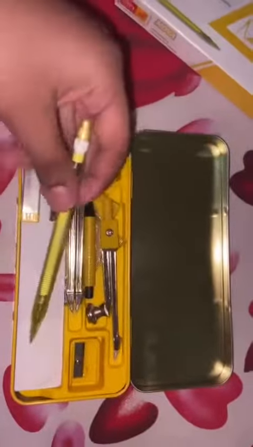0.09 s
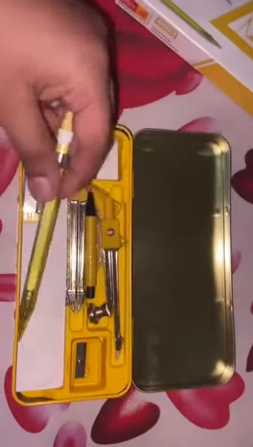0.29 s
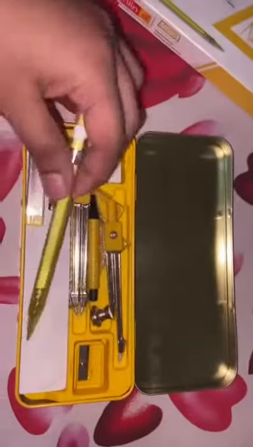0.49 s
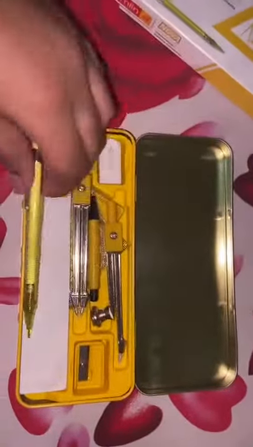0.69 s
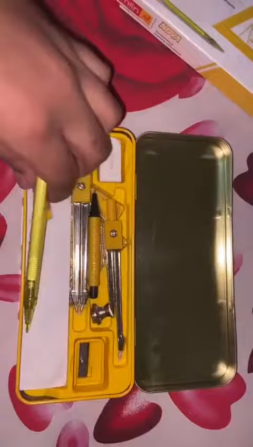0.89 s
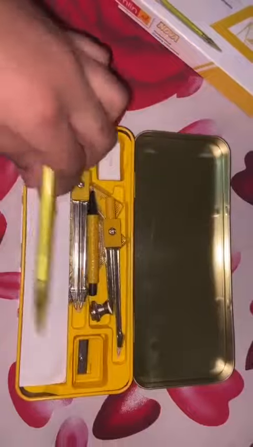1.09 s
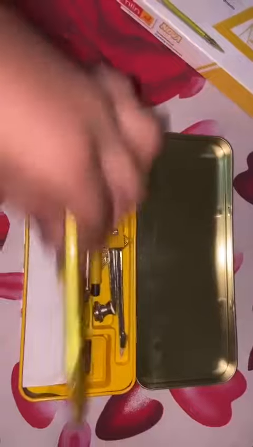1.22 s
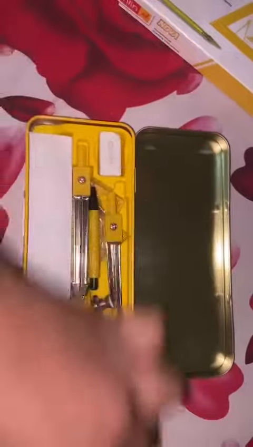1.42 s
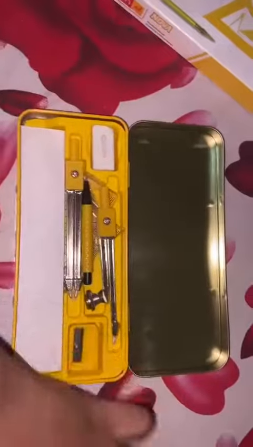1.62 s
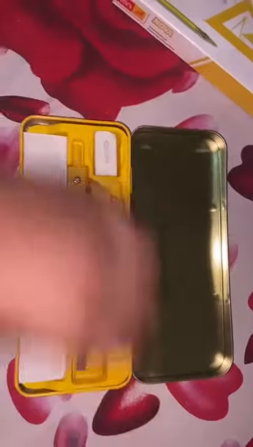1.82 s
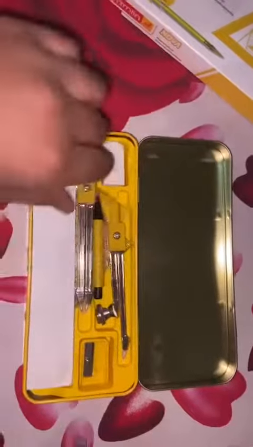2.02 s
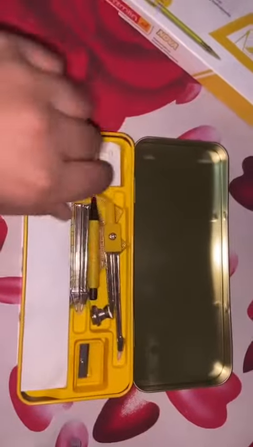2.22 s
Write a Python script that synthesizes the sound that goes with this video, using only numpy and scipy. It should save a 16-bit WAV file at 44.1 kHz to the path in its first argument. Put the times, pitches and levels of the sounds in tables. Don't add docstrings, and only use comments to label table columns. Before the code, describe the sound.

Plastic instrument tray knocks sharply in a thin tin case as a pencil rattles free

```python
import sys
import numpy as np
from scipy import signal
from scipy.fft import rfft, irfft
from scipy.io import wavfile

SR = 44100
rng = np.random.default_rng(int(sys.argv[2]) if len(sys.argv) > 2 else 0)


def decibels_to_gain(level_db):
    exponent = np.asarray(level_db, float) / 20
    return 10 ** exponent


def materialize(psi):
    bounded = np.clip(np.atleast_2d(psi).T, -1, 1)
    quanta = np.round(bounded * 32767).astype(np.int16)
    wavfile.write(sys.argv[1], SR, quanta)


N = 101430

# [f/Hz, level/dB]
TRAY_MODES = [(400, -14.5), (900, -13.5), (1250, -14), (1570, -4), (2300, 1.5), (2900, -3.5), (3670, -2),
              (4400, -6), (5100, -9.5), (5900, -7), (7000, -7), (8300, -8.5), (9600, -10), (11000, -14.5)]
# [f/Hz, density/dB per Hz]
RUB_COLOUR = [(250, 2), (400, -0.5), (700, -13), (1500, -6), (2500, -2), (4000, -11), (8000, -16),
              (12000, -23)]
TRAY_T60_S = 0.019
TRAY_LOW_HZ = 237


def rms_one(x):
    return x / np.sqrt(np.mean(x ** 2) + 1e-20)


def coloured(x, points):
    hz, db = np.transpose(points)
    bin_hz = np.maximum(np.arange(len(x) // 2 + 1) * SR / len(x), 1)
    gain = decibels_to_gain(np.interp(np.log(bin_hz), np.log(hz), db))
    return rms_one(irfft(rfft(x) * gain, len(x)))


def filtered(x, order, edge_hz, kind):
    return signal.sosfilt(signal.butter(order, edge_hz, kind, fs=SR, output="sos"), x)


def add(out, s, x):
    i = int(s * SR)
    out[i:i + len(x)] += x[:len(out) - i]


def air():
    # [f/Hz, density/dB]
    hiss_colour = [(25, -11), (50, -1.5), (140, -5), (200, -13.5), (370, -13), (520, -19.5), (4000, -27),
                   (11500, -30.5)]
    # [f/Hz, width/Hz, level/dB]
    fan_lines = [
        (49, 12.5, -67.5),
        (92.2, 6.2, -71.5),
        (137.63, 3.07, -63.5),
        (363.2, 24, -71.5),
        (7870, 710, -73),
    ]
    out = decibels_to_gain(-57.5) * coloured(rng.standard_normal(N), hiss_colour)
    for hz, width_hz, db in fan_lines:
        noise = rng.standard_normal(N + SR)
        line = filtered(noise, 2, [hz - width_hz / 2, hz + width_hz / 2], "band")
        out = out + decibels_to_gain(db) * rms_one(line[SR:])
    return out


def rubbing():
    # [t/s, level/dB]
    handling = [(0, -56), (0.051, -50.5), (.1, -68), (.155, -63.5), (0.227, -41.5), (.4, -65.5),
                (0.502, -70.5), (.55, -43.5), (0.669, -51), (.74, -56.5), (0.852, -47), (.93, -52.5),
                (1.072, -73), (1.75, -67.5), (1.96, -64), (2.032, -56), (2.17, -59), (2.22, -65)]
    grains_per_s, grain_db = 1200, 1.5
    s, db = np.transpose(handling)
    sizes = decibels_to_gain(grain_db * np.minimum(rng.exponential(1, N), 4)) * rng.choice([-1, 1], N)
    grains = sizes * (rng.random(N) < grains_per_s / SR)
    body = coloured(grains, RUB_COLOUR) + decibels_to_gain(0.5) * coloured(rng.standard_normal(N), RUB_COLOUR)
    r = decibels_to_gain(-60 / (TRAY_T60_S * SR))
    for hz, level_db in TRAY_MODES[3:6]:
        w = 2 * np.pi * hz / SR
        ring = signal.lfilter([1], [1, -2 * r * np.cos(w), r * r], grains)
        body = body + decibels_to_gain(level_db - 12) * rms_one(ring)
    body = filtered(body, 4, TRAY_LOW_HZ, "high")
    return decibels_to_gain(np.interp(np.arange(N) / SR, s, db)) * rms_one(body)


def scraping():
    # [t/s, length/s, level/dB, brightness/dB]
    scrapes = [
        (0.016, 0.069, -48.5, -20),
        (0.174, 0.13, -53, -3.5),
        (0.805, 0.0348, -38.5, -9),
        (0.84, 0.066, -45, -17),
        (1.835, 0.132, -74, 14.5),
        (1.984, 0.059, -39.5, -35),
        (2.143, 0.04, -47.5, -12),
    ]
    edge_s = 0.0046
    out, t = np.zeros(N), np.arange(N) / SR
    grains = rng.standard_normal(N) ** 3
    dull = filtered(coloured(grains, RUB_COLOUR), 2, 700, "high")
    bright = rms_one(np.diff(grains, prepend=0))
    for s, length_s, db, bright_db in scrapes:
        envelope = np.clip(np.minimum(t - s, s + length_s - t) / edge_s, 0, 1)
        out += decibels_to_gain(db) * envelope * (dull + decibels_to_gain(bright_db) * bright)
    return out


def ticks():
    # [t/s, peak/dB, f/Hz, broad click/dB]
    steel_ticks = [(0.022, -32, 8700, -6), (0.031, -39, 8900, -5), (0.063, -42, 6500, -13),
                   (0.067, -33.5, 3000, 8), (.076, -36, 2580, -1), (.985, -48, 2950, -10.5),
                   (1.2009, -32.5, 8960, -6.5), (1.25, -49, 7550, -26.5), (1.262, -49.5, 7670, -28.5),
                   (1.477, -45.5, 8770, -7), (1.580, -34.5, 9070, -25), (1.684, -45, 8700, -2),
                   (1.687, -41, 8530, -8), (1.709, -40.5, 10700, -20.5), (1.716, -43, 2130, -32),
                   (1.722, -45, 10600, -20), (1.747, -46.5, 10900, -26)]
    out, t = np.zeros(N), np.arange(900) / SR
    for s, peak_db, hz, wide_db in steel_ticks:
        noise = rng.standard_normal((2, len(t)))
        x = rms_one(filtered(noise[0], 1, [hz / 1.25, hz * 1.2], "band"))
        x = x + decibels_to_gain(wide_db) * np.diff(noise[1], prepend=0)
        x = x + decibels_to_gain(2.5) * np.sin(2 * np.pi * hz * t)
        x = x * decibels_to_gain(-60 * t / (0.007 + 10 / hz))
        add(out, s, decibels_to_gain(peak_db) * x / np.abs(x).max())
    return out


def struck(hits, modes, t60_s):
    # [t/s, f/Hz, gain/dB]
    spots = [(.202, 2740, 17), (.216, 2817, 2), (.292, 4200, 3), (.292, 6740, 9), (.52, 3720, -4.5),
             (.424, 3000, -6.5), (.216, 7870, 4), (.216, 9900, 2), (.52, 2200, 6), (.52, 7760, 9.5),
             (.52, 10300, 7), (.528, 2970, 1.5), (.533, 2900, 6), (.542, 2900, 2), (.627, 3000, 6),
             (.632, 3910, 5.5), (.632, 5460, 16), (.64, 3040, 5.5), (.64, 3940, 8), (.64, 850, 9.5),
             (.807, 2950, 7.5), (.8105, 2870, 4), (.815, 2970, 6), (2.068, 1480, 4), (.216, 4700, -6),
             (.52, 1380, -4), (.822, 1460, 9), (.852, 1440, 10), (.858, 1470, 17), (.869, 2920, 2),
             (.947, 1700, 3), (.947, 4230, 11), (1.018, 3330, 11.5), (1.989, 1510, 14), (1.999, 5270, 10),
             (2.017, 1500, -7), (2.027, 1560, 4), (2.031, 1070, 17), (2.055, 1500, 19), (2.117, 2750, 10),
             (2.117, 4230, 13)]
    spot_octaves, spot_s = 0.13, 0.0025
    cluster, cluster_edge_db, members = 0.0225, -2, 5
    travel = 0.0732
    ring_fall = 0.15
    mode_spread_db, stutter = -0.5, 0.69
    settle_db, settle_s = -8, 0.0067
    crack_db, crack_t60_s = -14, 0.053
    build_s, contact_lag_s = 0.00019, 0.0007
    out, t = np.zeros(N), np.arange(2600) / SR

    hz, level_db = np.repeat(np.transpose(modes), members, axis=1)[:, :, None]
    wide = cluster * (1 + 2.02 * (hz > 4200))
    place = np.tile(np.linspace(-1, 1, members), len(modes))[:, None]
    level_db = level_db + cluster_edge_db * place ** 2
    hz = hz * (1 + wide * place + 0.0073 * rng.standard_normal(hz.shape))
    low = hz < 600
    late = np.maximum(t - travel * np.maximum(hz ** -.5 - .016, 0), 0)
    decay = decibels_to_gain(-60 * late / (t60_s * (hz / 2500) ** -ring_fall))
    bank = np.sin(2 * np.pi * hz * late) * decay
    bank = np.where(low, bank, filtered(bank, 2, 650, "high"))

    for s, peak_db, tilt_db, bass_db, stutter_ms in hits:
        draw = rng.standard_normal((2, len(hz), 1))
        noise = rng.standard_normal((2, len(t)))
        spot_db = 0
        for when_s, at_hz, db in spots:
            if abs(when_s - s) < spot_s:
                spot_db = spot_db + db * np.exp(-(np.log2(hz / at_hz) / spot_octaves) ** 2)
        tone_db = tilt_db * np.log2(hz / 2500) + bass_db * low
        gain = decibels_to_gain(level_db + spot_db + tone_db + mode_spread_db * draw[0])

        fade = np.exp(-1000 * t / stutter_ms)
        contact = (t == 0) + stutter * np.maximum(noise[0] - 1.8, 0) * fade
        comb = np.interp(hz, np.arange(len(t) // 2 + 1) * SR / len(t), np.abs(rfft(contact)))
        sign = np.where(low, 1, np.sign(draw[1]))
        rings = np.sum(gain / np.maximum(comb, .5) * sign * bank, axis=0)

        jostle = np.diff(np.maximum(np.abs(noise[1]) - 2.2, 0), prepend=0)
        jostle = decibels_to_gain(settle_db) * jostle * np.exp(-t / settle_s) * np.cos(np.pi * t / t[-1] / 2)
        x = signal.fftconvolve(rings, contact + jostle)[:len(t)] * (1 - np.exp(-t / build_s))
        crack = np.diff(noise[1], prepend=0) / 4 * decibels_to_gain(-60 * t / crack_t60_s) ** .5 * fade ** .5
        x = x / np.abs(x).max() + decibels_to_gain(crack_db + 2 * tilt_db) * crack
        add(out, s + contact_lag_s, decibels_to_gain(peak_db) * x)
    return filtered(out, 4, TRAY_LOW_HZ, "high")


def finger_taps():
    # [t/s, peak/dB, brightness/dB per octave, bass/dB, stutter/ms]
    taps = [(0.051, -34.5, -2.5, 4.5, 4.4), (1.989, -29.5, -1, -9, 4.5), (1.995, -24, -3, 13.5, 4.9),
            (1.999, -26.5, -0.5, -17, 6.2), (2.004, -34, -0.5, 13, 11), (2.017, -22, -1, -21, 1.2),
            (2.021, -19.5, -1.5, 7.5, 0.89), (2.0265, -16, -2.1, 1, 1.7), (2.031, -25.5, 0, -10.5, 8.6),
            (2.041, -41, -11, 13, 4), (2.068, -44, -2, 1, 3), (2.055, -38, -12.5, 8, 4.2),
            (2.083, -41.5, -10, 8, 2.8), (2.117, -38.5, 4, 3, 6)]
    # [f/Hz, level/dB]
    pad_modes = [(340, -26.5), (700, -7), (1050, -6.5), (1290, -8), (1500, 0), (2000, -29), (2700, -5.5),
                 (3900, -12), (5300, -13.5), (7200, -17.5), (9500, -25)]
    return struck(taps, pad_modes, 0.013)


def tray_knocks():
    # [t/s, peak/dB, brightness/dB per octave, bass/dB, stutter/ms]
    knocks = [(0.2008, -28.5, 2, -2, 16), (0.2153, 0.5, 0, -5, 3.9), (0.282, -33, -3, -10, 0.84),
              (0.2912, -14, 1, 2, 2.95), (0.424, -24.5, -0.5, 2, 1.9), (0.438, -29, 0, 3, 2.5),
              (0.52, -4.5, 3.5, 13, 2.75), (0.533, -13, 5, 17, 1.6), (0.542, -29.5, 0.5, 9, 1.3),
              (0.573, -30.5, -4.5, -19, 4.8), (0.599, -52, -3, -6, 2.2), (0.606, -43, 6, -22, 2.4),
              (0.612, -30, -10.5, -30, 2.8), (0.627, -20, -2.5, -17, 2.5), (0.632, -8.5, -2.7, -8, 4.4),
              (0.636, -13, -3, -13, 4.1), (0.6405, -9.5, 0.5, -34, 0.37), (0.655, -25, 2.5, -12, 4.1),
              (0.663, -28.5, 0, -13, 2.5)]
    return struck(knocks, TRAY_MODES, TRAY_T60_S)


def pencil_rattles():
    # [t/s, peak/dB, brightness/dB per octave, bass/dB, stutter/ms]
    rattles = [(0.5275, -6, -0.5, 2.5, 4.3), (0.758, -32.5, 1.5, -9, 3.7), (0.8062, -16.5, 0, 8, 7.9),
               (0.815, -28, 3.5, -3, 3), (0.823, -24.5, -19, -24, 3.9), (0.828, -31, -5, 22, 0.91),
               (0.844, -24, -11, -23, 1.8), (0.852, -15, -1.5, 7, 2.2), (0.858, -18, 2, -13, 2.1),
               (0.869, -17.5, -0.2, 6, 2.1), (0.885, -26, -0.5, 14, 1.1), (0.902, -28, 3.5, 0, 1.6),
               (0.912, -32, 0.3, -6, 2), (0.8095, -21, -4, -4, 2.05), (0.947, -33.5, 0.5, -5, 1.6),
               (1.018, -39, -1, -0.8, 3.3)]
    # [f/Hz, level/dB]
    pencil_modes = [(330, -25.5), (800, -17), (1430, -1.5), (1800, -1), (2350, -3.5), (2900, 5),
                    (3600, -4.5), (4400, -9.5), (5500, -9), (6800, -7), (8300, -12), (10200, -11)]
    return struck(rattles, pencil_modes, 0.017)


def thumps():
    # [t/s, level/dB, f/Hz]
    pushes = [(0.552, -46, 64), (0.657, -49, 57.6), (0.842, -40, 118), (.875, -44, 61), (1.575, -52, 315),
              (1.6, -52, 375), (2.13, -49.5, 240), (2.192, -47, 245), (0.831, -40, 196),
              (1.729, -41.5, 300), (1.736, -38.5, 67), (1.999, -43, 73.5)]
    out, t = np.zeros(N), np.arange(6000) / SR
    for s, db, hz in pushes:
        swell = 3 * hz * t * np.exp(-1.2 * hz * t)
        add(out, s, decibels_to_gain(db) * swell * np.sin(2 * np.pi * hz * t))
    return out


def leg_snaps():
    # [t/s, peak/dB, brightness/dB per octave, bass/dB, stutter/ms]
    snaps = [
        (.830, -25.5, -2, -15.5, 0.89),
        (1.6997, -22.5, -5, -18.5, .6),
        (1.7105, -44, -4.5, -26, .6),
        (2.170, -29, -3, -20, 0.82),
        (2.176, -43.5, 3, -20, 1.5),
    ]
    # [f/Hz, level/dB]
    leg_modes = [(2080, -18), (2900, -9), (3545, -5), (4300, -3), (4940, -6.5), (6600, -12), (8800, -13),
                 (10800, -21)]
    return struck(snaps, leg_modes, 0.0088)


def room(x):
    t60_s, level_db, wall_cut_hz = 0.2, -21, 6400
    t = np.arange(SR // 2) / SR
    dull = np.exp(-2 * np.pi * wall_cut_hz / SR)
    tail = signal.lfilter([1], [1, -dull], rng.standard_normal(len(t)))
    tail = tail * decibels_to_gain(-60 * t / t60_s) * (t > .004)
    return decibels_to_gain(level_db) * signal.fftconvolve(x, tail / np.sqrt(np.sum(tail ** 2)))[:N]


def scene():
    near = scraping() + ticks() + finger_taps() + tray_knocks() + pencil_rattles() + leg_snaps()
    return (air() + rubbing() + near + room(near) + thumps())[None]


def roll_off(x):
    return signal.sosfilt(signal.butter(12, 12680, fs=SR, output="sos"), x)


def record(dry):
    x = np.tanh(dry / 1.183) * 1.126
    x = signal.sosfilt(signal.ellip(8, .5, 36, 11610, fs=SR, output="sos"), x)
    x = filtered(x, 2, 12500, "low")
    return roll_off(x)


dry = scene()
out = record(dry)
materialize(out)
```